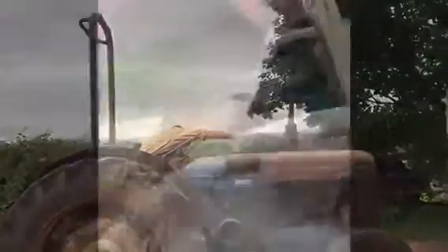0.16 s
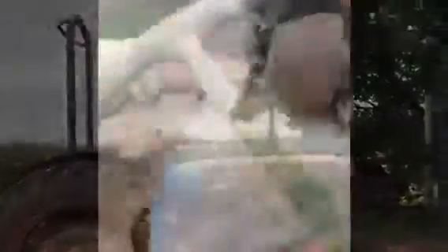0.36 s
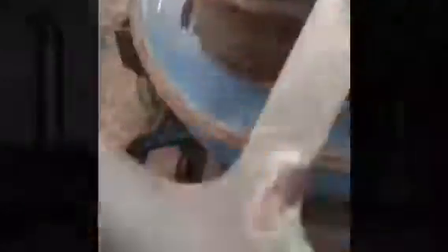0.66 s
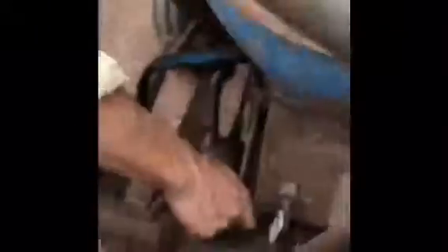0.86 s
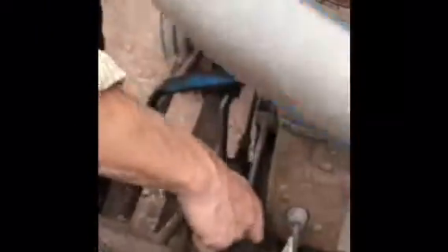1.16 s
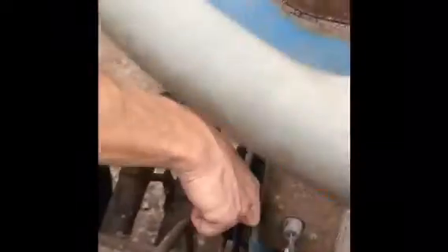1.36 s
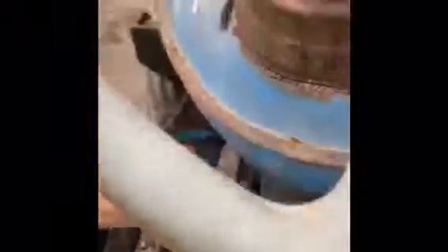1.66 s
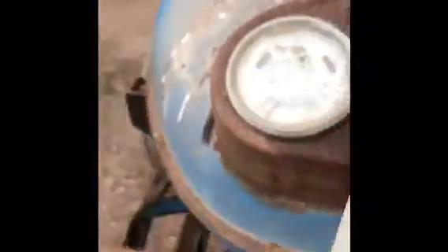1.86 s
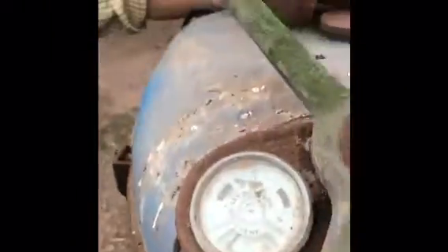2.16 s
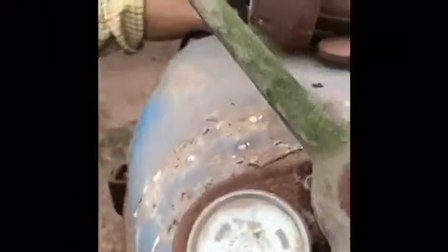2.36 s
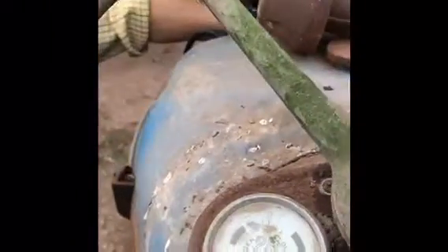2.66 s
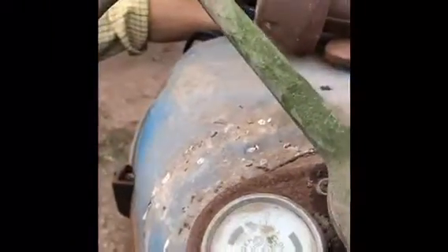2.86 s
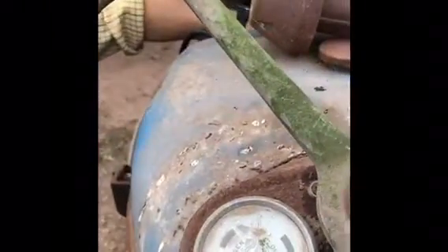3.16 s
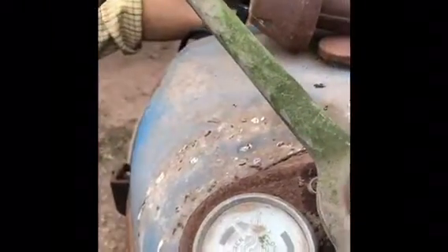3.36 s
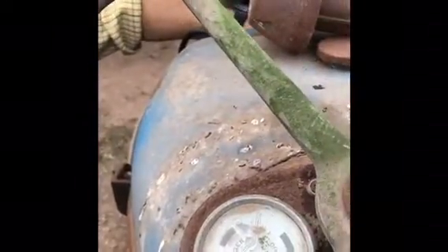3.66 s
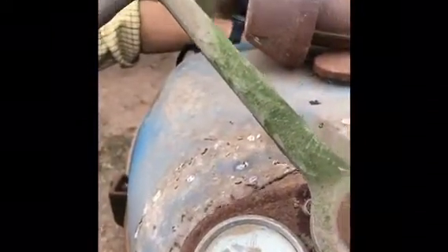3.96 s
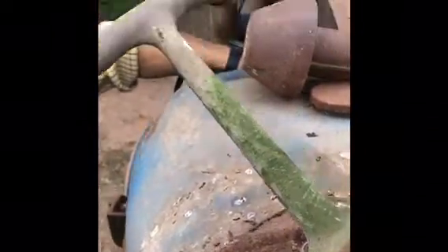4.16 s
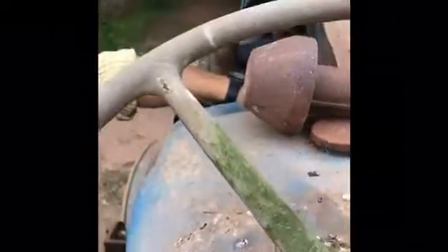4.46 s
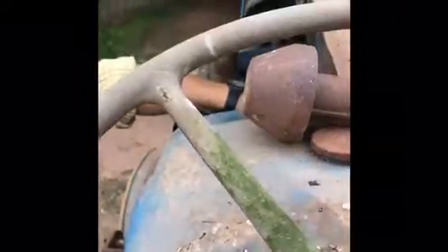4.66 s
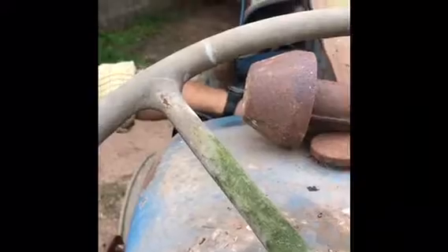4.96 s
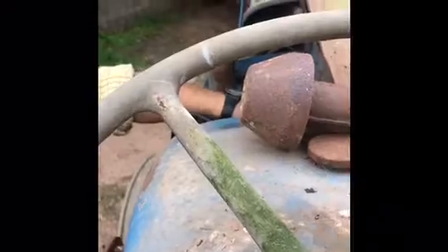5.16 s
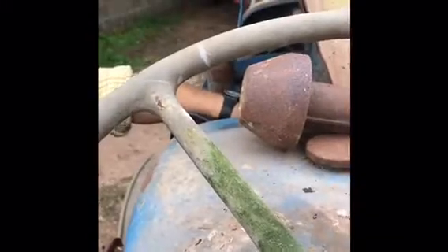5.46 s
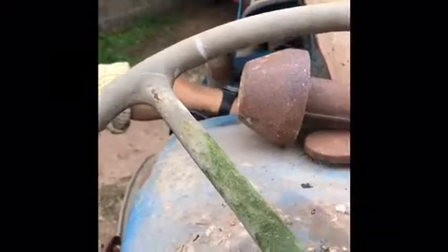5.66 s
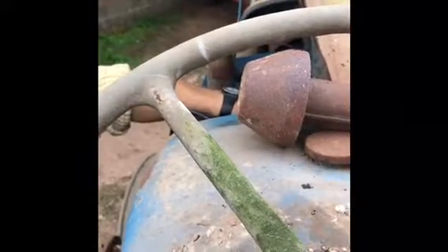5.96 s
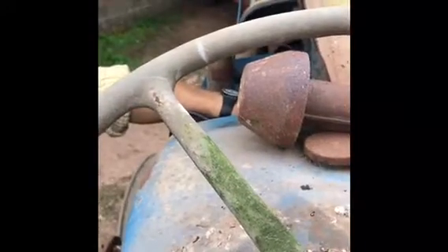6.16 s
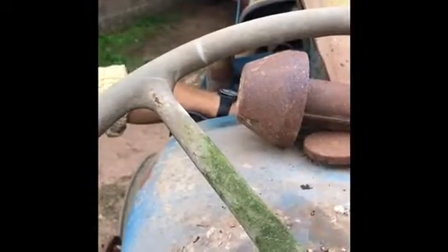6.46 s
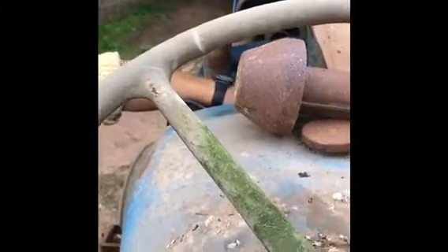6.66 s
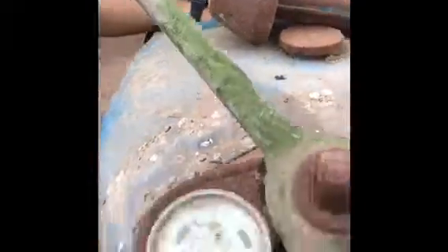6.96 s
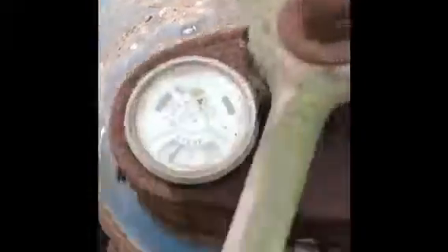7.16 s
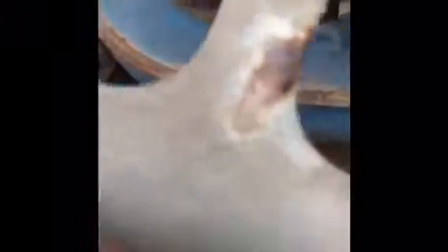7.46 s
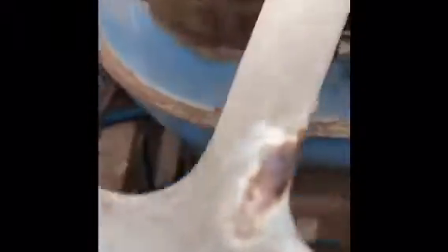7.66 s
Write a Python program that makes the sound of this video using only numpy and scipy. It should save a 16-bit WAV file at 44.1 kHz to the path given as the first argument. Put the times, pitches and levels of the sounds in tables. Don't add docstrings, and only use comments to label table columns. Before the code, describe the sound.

Close to a phone outdoors, an old tractor engine clatters to a stop with a last knock. After a quiet gap the starter is tried several times: clunk, whirring drone, dull exhaust thumps, a short harsh clash and later a long rough grind. Metal panels ring on after each try, levers tick, and a small bird calls faintly over light wind.

```python
import sys
import numpy as np
from scipy import signal
from scipy.io import wavfile
from scipy.ndimage import uniform_filter1d, minimum_filter1d

SR = 44100
rng = np.random.default_rng(int(sys.argv[2]) if len(sys.argv) > 2 else 0)


def elevation(decibels):
    levels = np.asarray(decibels, float)
    return 10 ** (levels / 20)


def master_out(mix):
    frames = np.transpose(np.atleast_2d(mix))
    ceiling = np.clip(frames, -1, 1)
    pcm = np.round(ceiling * 32767).astype(np.int16)
    wavfile.write(sys.argv[1], SR, pcm)


N = 343523

# pitch in Hz, width in Hz, level in dB.
HOUSING_MODES = [(567, 46, -9), (671.4, 77, -4.5), (742, 30, -2.5), (890, 94, -4), (950, 32, -5),
                 (990, 60, -7), (1091, 69, -7), (1200, 15, -12.5), (1288, 50, 0), (1537, 27, -12.5),
                 (1643, 60, -21)]
GEAR_MODES = [(2576, 100, -3.5), (2750, 140, -3), (2930, 60, -4), (3290, 98, -0.5), (3500, 98, 0),
              (3630, 100, -2), (3880, 60, -1), (4268, 140, -1), (4480, 61, -8.5)]
RIM_MODES = [(4266, 89, -4.5), (5300, 39, -3.5), (6100, 260, -8)]
COVER_MODES = [(1660, 27, -3), (2040, 180, -12.5), (2386, 90, -6.5)]
# frequency in Hz, level in dB.
HOUSING_WASH = [(330, -31), (450, -9.5), (1450, -11.5), (1800, -25), (2300, -54)]
GEAR_WASH = [(1700, -28.5), (2300, -12.5), (3000, -1.5), (4300, -5), (5100, -21.5), (6000, -46)]
RIM_WASH = [(3800, -39.5), (4500, -5), (7000, -13.5), (9500, -20), (12000, -48.5)]
COVER_WASH = [(1200, -33), (1550, -5.5), (2600, -9.5), (3200, -28.5)]
FIZZ_WASH = [(4000, -24.5), (7000, 0), (9500, 0.5), (10700, -7), (12500, -1.5), (15600, -8), (16000, -30),
             (16600, -39)]
# start in seconds, let-go in seconds,
# start level in dB, let-go level in dB, loose scrape of the teeth in dB.
PULLS = [
    (1.908, 2.15, -33.5, -37.5, 8),
    (3.444, 3.91, -27.5, -29, -5.5),
    (5.321, 5.39, -33.5, -32.5, -12),
    (5.401, 5.6, -26.5, -24, -8),
    (7.456, 7.8, -23.5, -29.5, -4.5),
]
GRINDS = [
    (2.719, 2.809, -20.5, -21.5, 1.5),
    (5.598, 6.096, -23.5, -13, 2),
]


def evened(x):
    return x / np.sqrt(np.mean(x ** 2) + 1e-20)


def body(modes, wash, size=16384):
    hz = np.fft.rfftfreq(size, 1 / SR)
    wash_hz, wash_db = np.transpose(wash)
    skirt_db = np.interp(np.log(hz + 1), np.log(wash_hz), wash_db, left=-90, right=-90)
    peaks = sum(elevation(2 * db) / (1 + (2 * (hz - mode_hz) / width) ** 2) ** 2 for mode_hz, width, db in modes)
    log_gain = np.log(elevation(2 * skirt_db) + peaks + 1e-9) / 2
    circle = np.concatenate([log_gain, log_gain[-2:0:-1]])
    spectrum = np.exp(circle - 1j * signal.hilbert(circle).imag)
    taps = np.fft.ifft(spectrum).real[:size // 2]
    return taps / np.linalg.norm(taps)


def ring(drive, modes, wash):
    return signal.oaconvolve(drive, body(modes, wash))[:N]


def wander(seconds):
    span = max(int(seconds * SR), 2)
    return evened(uniform_filter1d(uniform_filter1d(rng.standard_normal(N), span), span))


def resonate(x, hz, width):
    turn = np.exp(2j * np.pi * hz * np.arange(len(x)) / SR)
    r = np.exp(-np.pi * width / SR)
    smooth = signal.lfilter([(1 - r) ** 2], [1, -2 * r, r * r], x / turn)
    return 2 * (turn * smooth).real


def patchy(x, patchy_db):
    z = signal.stft(x, nperseg=512, noverlap=384)[2]
    field = rng.standard_normal(z.T.shape)
    field = uniform_filter1d(uniform_filter1d(field, 14, 0), 6, 1).T
    return signal.istft(z * elevation(patchy_db * evened(field)), nperseg=512, noverlap=384)[1][:N]


def shaking():
    rundown = [
        (-.02, 0.44, -35.5, -40, -2),
        (.472, 0.81, -38.5, -51.5, -1),
    ]
    # offset in dB, climb while held in dB/s, share of the drop (0-4), coasting fall in
    # dB/s.
    rundown_parts = [(2, 2.5, 1.3, 30), (4, -11, 0.84, 27), (-13, -18, 0.2, 18), (-24, -4, 1.2, 18),
                     (-21.5, 8, 3.6, 31), (-13.5, 16, .1, 8.5), (-7.5, -15, 0.49, 6.5), (-7, -6, 1.1, 1),
                     (-13.5, 13, 0.036, 2.5)]
    pull_parts = [(-0.5, 3.5, 1.05, 26.9), (-14, 28, 1.2, 36), (-31, 1.5, 0.87, 15), (-13, -5.5, 1.3, 28),
                  (-66, 1.5, 1.05, 30), (-6.5, -0.5, .1, 19), (-5, -0.5, 0.15, 22), (-5.5, 0, 0.14, 28),
                  (-23, 4, 0.092, 12)]
    grind_parts = [(-1.5, -5.5, 0.68, 66), (-1, -3.5, 0.55, 120), (-9.5, -6.5, 2.8, 30), (-2, -11.5, 1, 33),
                   (-60.5, 0.5, 1.05, 29.4), (-13.5, -3.5, 0.26, 8.7), (-13.5, -23, 0.27, 18),
                   (-8, -13.5, 0.51, 31), (-17.5, -15, .1, 3.9)]
    resting_db = [-67.5, -82, -75.5, -92, -120, -67, -67, -65, -56]
    scrape_share = [-0.23, 0.12, 1.1, -1, -0.14, 0.29, 0.44, -.3, -1.2]
    # time to let go [s], then level left after letting go [dB].
    release_times = [.08, .085, .11]
    coasting_levels = [-69.5, -35, -42]
    engage_s = .004

    t = np.arange(0, N / SR + .01, .001)
    power = elevation(2 * np.array(resting_db))[:, None] * np.ones(len(t))
    all_spells = (rundown, PULLS, GRINDS)
    all_parts = (rundown_parts, pull_parts, grind_parts)
    for spells, parts, release_s, coasting_db in zip(all_spells, all_parts, release_times, coasting_levels):
        offset_db, climb, share, coast = np.transpose(parts)[:, :, None]
        for start, end, start_db, end_db, scrape_db in spells:
            held = np.clip(t - start, 0, end - start)
            free = np.maximum(t - end, 0)
            db = start_db + offset_db + ((end_db - start_db) / (end - start) + climb) * held
            db = db + np.array(scrape_share)[:, None] * scrape_db
            db = db - share * (end_db - coasting_db) * np.minimum(free / release_s, 1) - coast * free
            power = power + elevation(2 * db) * np.clip((t - start) / engage_s, 0, 1) ** 2
    return [np.interp(np.arange(N) / SR, t, db) for db in 10 * np.log10(power)]


def starter(housing_db, gear_db, fizz_db, whine_db, clatter_db):
    click_level = elevation(3 * np.minimum(rng.exponential(1, N), 4))
    clicks = (rng.random(N) < 1500 / SR) * click_level * rng.choice([-1, 1], N)
    clumps = elevation(1.6 * wander(0.008) + 0.9 * wander(0.027))
    drive = evened(clumps * (.5 * evened(clicks) + 0.5 * rng.standard_normal(N)))
    housing = ring(drive * elevation(housing_db - 6.0), HOUSING_MODES, HOUSING_WASH)
    gear = ring(drive * elevation(gear_db - 8.0), GEAR_MODES, GEAR_WASH)
    rim = ring(drive * elevation(0.51 * gear_db + 0.47 * fizz_db - 6.5), RIM_MODES, RIM_WASH)
    cover_gain = elevation(clatter_db) + elevation(0.45 * housing_db + 0.53 * gear_db - 16.0)
    cover = ring(drive * cover_gain, COVER_MODES, COVER_WASH)
    fizz = ring(drive * elevation(fizz_db - 7.5), [], FIZZ_WASH)
    whine = elevation(whine_db) * evened(resonate(drive, 1290, 60))
    tappets = elevation(clatter_db + 5) * evened(resonate(drive, 3480, 450))
    return whine + patchy(tappets + housing + gear + rim + cover + fizz, patchy_db=2.0)


def sheet_metal(tank_db, bonnet_db, wing_db, rumble_db):
    # pitch in Hz, width in Hz, level in dB.
    tank_modes = [(140, 6.2, 0.002)]
    bonnet_modes = [(205, 1.4, -3.5), (238, 20, -14)]
    wing_modes = [(307, 17, 0.037), (358, 5.2, 1)]
    # frequency in Hz, level in dB.
    tank_wash = [(105, -44.5), (125, -9), (165, -13), (190, -51.5)]
    bonnet_wash = [(150, -48), (180, -13), (265, -20.5), (310, -44.5)]
    wing_wash = [(230, -39.5), (275, -6.5), (430, -9), (520, -45)]
    rumble_wash = [(22, -40), (40, -19.5), (60, -9.5), (105, -3), (125, -10.5), (150, -37)]

    shake = rng.standard_normal((4, N))
    tank = ring(shake[0] * elevation(tank_db - 5.0), tank_modes, tank_wash)
    bonnet = ring(shake[1] * elevation(bonnet_db - 1.5 + 0.56 * wander(.04)), bonnet_modes, bonnet_wash)
    wing = ring(shake[2] * elevation(wing_db - 3.5 + 0.5 * wander(.03)), wing_modes, wing_wash)
    rumble = ring(shake[3] * elevation(rumble_db - 5.5 + 1.6 * wander(.04)), [], rumble_wash)
    return tank + bonnet + wing + rumble


def gusts():
    # time in seconds, level in dB.
    gust_curve = [(0, -48), (.4, -50), (.8, -53), (1.05, -85), (1.5, -69.5), (7.79, -68)]
    # frequency in Hz, level in dB.
    gust_wash = [(15, -37), (24, 3.5), (40, 2.5), (60, -29)]
    level_db = np.interp(np.arange(N) / SR, *np.transpose(gust_curve))
    return ring(rng.standard_normal(N) * elevation(level_db + 2.4 * wander(.06)), [], gust_wash)


def open_air():
    # frequency in Hz, level in dB.
    air_wash = [(200, -7.5), (550, 6.5), (1400, -5.5), (2800, -11.5), (8000, -20.5), (15500, -24.5),
                (16000, -46), (16600, -50.5)]
    return elevation(-67 + 1.4 * wander(0.13)) * ring(rng.standard_normal(N), [], air_wash)


def puffs():
    # start in seconds, level in dB, pitch in Hz, length in seconds.
    puff_rows = [(0.01, -34.5, 3440, 0.019), (0.087, -39.5, 3480, .07), (0.255, -44, 3520, 0.043),
                 (0.292, -38, 3460, 0.045), (0.355, -48.5, 3420, 0.032), (0.404, -47, 2620, 0.048),
                 (0.466, -39, 3420, 0.064), (0.099, -48.5, 5170, 0.11), (2.126, -42.5, 1290, 0.087),
                 (3.489, -34, 1290, 0.054), (3.552, -42, 1290, 0.03), (3.564, -43, 2980, .03),
                 (3.631, -38, 1290, .04), (3.694, -34, 1290, 0.023), (3.764, -40, 2660, .05),
                 (3.791, -38, 3530, 0.053), (3.796, -34, 1290, 0.033), (3.807, -31, 960, 0.053),
                 (3.827, -39, 2640, 0.045), (3.891, -36, 1110, 0.019), (3.94, -29, 1290, 0.027),
                 (4.056, -43, 3900, 0.034), (4.078, -47, 1200, .04), (4.099, -52, 525, 0.21),
                 (4.208, -51, 2900, 0.047), (4.265, -50, 3870, .04), (4.3, -49.5, 515, .1),
                 (4.443, -56, 4200, .02), (4.585, -61, 2700, .04), (4.697, -67, 2880, .02),
                 (4.971, -55, 800, 0.036), (5.611, -32, 945, .04), (5.862, -28.5, 3820, 0.068),
                 (5.903, -29, 940, 0.062), (5.94, -26, 3700, 0.057), (6.029, -21.5, 882, 0.071),
                 (6.04, -24, 4080, 0.037), (6.077, -30, 895, 0.032), (2.735, -24.5, 522, 0.073),
                 (5.63, -27, 368, 0.056), (5.75, -34, 1480, 0.041), (6.1, -35.5, 1500, 0.045),
                 (7.536, -38, 1200, .06), (7.649, -36.5, 3600, 0.021)]
    out = np.zeros(N + SR)
    for (s, db, hz, length), scrape in zip(puff_rows, rng.standard_normal((len(puff_rows), SR // 4))):
        band = evened(resonate(scrape, hz, .12 * hz))
        band = band[SR // 50:][:int(1.5 * length * SR)]
        swell = np.sin(np.pi * np.linspace(0, 1, len(band)) ** 0.5)
        out[round(s * SR):][:len(band)] += elevation(db) * band * swell
    return out[:N]


def blows():
    # start in seconds, knock peak in dB, ring gear above the knock in dB,
    # knock pitch in Hz.
    knock_rows = [(0.0188, -27, -4.5, 930), (0.1905, -29.5, -3, 670), (0.365, -27, -4.5, 660),
                  (0.472, -33.5, -9, 477), (0.5046, -28.5, 1.5, 950), (0.5165, -19.5, -22, 1310),
                  (0.621, -10, -11.5, 1240), (0.7058, -22.5, -17, 1290), (0.7784, -28, -10.5, 1170),
                  (0.844, -32.5, -14, 1370), (0.897, -43.5, -14, 450), (1.244, -42, -16.5, 470),
                  (1.4075, -32.5, -27, 500), (1.8517, -40, -25, 444), (4.389, -29, -21, 1200),
                  (1.598, -47, -22, 950), (1.155, -51, -25, 620), (4.791, -40, -14.5, 1410),
                  (4.92, -43, -35, 1056)]
    clunk_rows = [
        (1.9149, -21.5, -5.5, 790),
        (2.697, -34.5, -2.5, 1200),
        (3.4486, -13, -5.5, 668),
        (5.332, -32, -13, 875),
        (7.4659, -13.5, 0.5, 1240),
    ]
    stroke_rows = [(3.801, -29, -6, 990), (2.175, -36.5, -3, 1030), (2.2515, -46, 5, 1290),
                   (4.06, -30.5, -5.5, 1170), (4.25, -24, -6.5, 1250), (4.435, -48.5, 4, 784),
                   (4.9789, -49.5, -14, 760), (7.7303, -30, 4, 773), (7.7613, -21.5, -1, 1400)]
    clash_rows = [(2.724, -25.5, -1, 1190), (2.7354, -7, -0.5, 1280), (2.7466, -15.5, 3, 900),
                  (2.7601, -10, -0.5, 1310), (2.7835, -14, 2.5, 900), (2.7974, -12, 0, 1300),
                  (5.5776, -35, -0.5, 1200), (5.604, -19, 2.5, 730), (5.6202, -19, 2, 900),
                  (5.6789, -23, 2, 1290), (5.8269, -25.5, 3.5, 1290), (5.853, -21, 4, 1200),
                  (5.9624, -15.5, 2, 901), (5.985, -21, 4, 1290), (5.92, -16.5, 5.5, 900),
                  (6.0425, -14, -0.5, 900), (6.059, -11, -3.5, 1290), (5.6523, -17.5, 2, 1330),
                  (5.7013, -13, 5.5, 664), (5.729, -19.5, 7.5, 1290), (5.7845, -6.5, 2, 1200),
                  (5.905, -19, 11, 736), (5.9375, -13, 5.5, 970), (6.0222, -5.5, -2.5, 1300),
                  (6.091, -16.5, 4, 732)]
    snap_rows = [
        (2.0727, -51, 13, 713),
        (3.4289, -34, 0, 2280),
        (3.9348, -19.5, -12.5, 1290),
    ]
    hiss_rows = [(3.667, -43.5, 7, 746), (3.897, -36.5, 6.6, 706), (5.45, -57, 6, 900),
                 (5.545, -49.5, 6, 900), (7.668, -44.5, 9.4, 960), (7.755, -63, 6.5, 960)]
    # rise in seconds, t60 in seconds,
    # fizz above the gear in dB, cover above the knock in dB, housing above the knock in dB.
    blow_kinds = [(0.0032, 0.044, -5, -19.5, -25), (0.0041, 0.052, -21.5, -32, -7),
                  (0.02, 0.154, -23, -23, -8), (0.003, 0.068, -10, -18.5, -8),
                  (0.0033, 0.065, 4.5, -28, -11), (0.015, .08, 8, -19.5, -7.5)]

    gear, rim, fizz, knock, housing, cover = np.zeros((6, N + SR))
    t = np.arange(SR // 2) / SR
    all_rows = (knock_rows, clunk_rows, stroke_rows, clash_rows, snap_rows, hiss_rows)
    for rows, (rise_s, t60, fizz_up_db, cover_up_db, housing_up_db) in zip(all_rows, blow_kinds):
        fall_db = 60 * t / t60
        rise = np.minimum(t / rise_s, 1) ** 2
        for (s, knock_db, gear_up_db, hz), noise in zip(rows, rng.standard_normal((len(rows), len(t)))):
            at = slice(round(s * SR), round(s * SR) + len(t))
            gear_db = knock_db + gear_up_db
            pitched = rise * evened(resonate(noise, hz, .6 * hz))
            burst = rise * noise
            gear[at] += elevation(gear_db - 1.0 - fall_db) * burst
            rim[at] += elevation(0.85 * gear_db + 0.21 * fizz_up_db - 3.0 - 1.7 * fall_db) * burst
            fizz[at] += elevation(gear_db + fizz_up_db + 1.0 - 1.6 * fall_db) * burst
            housing[at] += elevation(knock_db + housing_up_db - 0.51 * fall_db) * burst
            cover[at] += elevation(knock_db + cover_up_db - 0.71 * fall_db) * burst
            knock[at] += elevation(knock_db - 6.5 - 0.49 * fall_db) * pitched
    bright = ring(gear, GEAR_MODES, GEAR_WASH) + ring(rim, RIM_MODES, RIM_WASH) + ring(fizz, [], FIZZ_WASH)
    dull = ring(housing, HOUSING_MODES, HOUSING_WASH) + ring(cover, COVER_MODES, COVER_WASH)
    return knock[:N] + dull + bright


def ticks():
    # start in seconds, peak in dB, pitch in Hz, t60 in seconds.
    tick_rows = [(0.0434, -47, 3320, 0.024), (0.0694, -32, 2360, 0.012), (0.1497, -24, 4550, 0.055),
                 (0.2094, -28, 3325, 0.027), (0.2578, -41.5, 3470, 0.024), (0.294, -25, 3620, 0.12),
                 (0.329, -19.5, 3640, 0.026), (0.407, -32, 2500, 0.046), (0.5894, -48, 2700, 0.037),
                 (1.384, -57, 3050, 0.04), (1.5994, -52, 7560, 0.04), (2.578, -43, 2880, 0.062),
                 (4.53, -46, 3550, 0.064), (4.8948, -47, 2680, 0.02), (5.0028, -49, 7160, 0.025),
                 (5.0344, -49, 6920, 0.035), (5.1027, -42, 7920, 0.02), (5.119, -41.5, 8740, 0.026),
                 (5.184, -49, 10900, 0.02), (5.193, -49, 10000, .02), (5.058, -54, 9000, .02),
                 (5.069, -53, 8000, .02), (5.112, -48, 10000, 0.017), (5.402, -45, 11000, 0.027),
                 (4.945, -45, 2000, 0.022), (7.298, -62.5, 11000, 0.018), (1.855, -45, 1500, 0.023),
                 (5.244, -52.5, 8050, 0.095), (5.2775, -38.5, 6460, 0.078), (6.555, -49, 4680, 0.024),
                 (6.9994, -56.5, 2650, 0.039), (7.1117, -54, 2650, 0.042), (7.3133, -38.5, 2670, 0.033)]
    switch_rows = [(1.886, -44, 12500, 0.1), (3.392, -60, 13000, .08), (3.47, -39, 12000, 0.05),
                   (5.28, -36.5, 9000, 0.03), (6.9, -51, 15000, .1), (7.449, -40, 17000, 0.082),
                   (5.278, -46, 18000, 0.066), (3.431, -33, 14000, 0.035)]
    rows = tick_rows + switch_rows
    out = np.zeros(N + SR)
    t = np.arange(SR // 10) / SR
    for (s, db, hz, t60), burst in zip(rows, rng.standard_normal((len(rows), len(t)))):
        tap = evened(resonate(burst, hz, 0.74 * hz)) + hz / 18000 * np.diff(burst, prepend=0)
        fall = elevation(db - 7.5 - 60 * t / np.clip(t60, .01, .1))
        out[round(s * SR):][:len(t)] += fall * np.minimum(t / 0.0028, 1) * tap
    return out[:N]


def yard(x):
    t = np.arange(SR // 3) / SR
    echoes = (rng.random(len(t)) < 2000 / SR) * rng.choice([-1, 1], len(t))
    taps = echoes * elevation(-60 * t / 0.22) * (t > .004)
    return signal.oaconvolve(x, taps / np.linalg.norm(taps))[:N]


def after_ring():
    # start in seconds, level in dB, then modes of pitch in Hz, level in dB, t60 in seconds.
    ring_rows = [
        (0.8, -55.5, [(105.7, 5, 9), (68.4, -2, 9), (238, -7.5, 2), (276, -4.5, 4)]),
        (1.409, -58, [(330, 1, 1.3), (990, -9.5, 3.2)]),
        (2.1, -48.5, [(1290, -2, 2.4), (890, -4.5, 1.8), (2590, -12, 2.5)]),
        (2.829, -34, [(88.25, -9, 3.6), (205, 1, 1.6), (307, -8, 1.2), (414, -27, 2.7), (624, -15, 0.55), (672, -16.5, 1.6)]),
        (3.999, -43.5, [(140, -4.5, 4), (307, -2, 1.8), (371, -8, 2), (680, -9.5, 1.6), (1287, -7, 1.8)]),
        (6.12, -29, [(140, 2, 1.1), (205, -7, 2.4), (238, -14, 2.6), (307, -7.5, 1.1), (373, -9.5, .6), (690, -23, 1.9), (896, -21, 1.4), (1007, -17.5, 0.67), (1220, -38.5, 5)]),
    ]
    out = np.zeros(N)
    flicker = elevation(2.0 * wander(0.03))
    flicker = np.concatenate([flicker, flicker[::-1]])
    for s, level_db, modes in ring_rows:
        t = np.arange(N - round(s * SR)) / SR
        grip = min(row[0] for row in PULLS + GRINDS if row[0] > s) - s
        free = np.clip(1 - (t - grip) / .04, 0, 1)
        for (hz, db, t60), (phase, shift) in zip(modes, rng.random((len(modes), 2))):
            tone = np.sin(2 * np.pi * (hz * t + phase)) * np.minimum(t / 0.025, 1)
            tone = tone * flicker[int(shift * N):][:len(t)]
            out[-len(t):] += elevation(level_db + db - 60 * t / t60) * tone * free
    return out


def bird():
    # start in seconds, level in dB, pitch in Hz, t60 in seconds.
    calls = [
        (1.572, -63, 7670, 0.35),
        (1.72, -61.5, 7220, 0.38),
        (4.449, -66.5, 7500, 0.48),
        (4.681, -83.5, 6780, 0.2),
        (4.994, -73, 7170, 1),
        (6.768, -76, 7140, .4),
    ]
    out = np.zeros(N)
    t = np.arange(SR // 4) / SR
    for s, db, hz, t60 in calls:
        breath = rng.standard_normal(len(t))
        whistle = evened(resonate(breath, hz, 110)) + .45 * evened(resonate(breath, 1.14 * hz, 250))
        buzz = 1.04 * evened(resonate(breath, .93 * hz, 900)) * elevation(-60 * t / (1.1 * t60))
        call = elevation(db - 60 * t / t60) * whistle + elevation(db) * buzz
        out[round(s * SR):][:len(t)] += call * np.minimum(t / 0.0092, 1)
    return out


def drone():
    # time in seconds, pitch in Hz, level in dB.
    tries = [
        [(1.92, 170, -44), (1.934, 173, -27), (2.022, 237, -43), (2.07, 190, -59), (2.106, 212, -38),
         (2.328, 202, -36.5), (2.538, 215, -61), (2.6, 238, -45)],
        [(3.46, 181, -26), (3.538, 209, -26), (3.704, 209, -23.5), (3.822, 202, -33), (3.842, 215, -27.5),
         (4.1, 180, -37.5), (4.228, 180, -43), (4.3, 224, -41)],
        [(5.36, 176, -51), (5.406, 172, -35), (5.54, 188, -28), (5.598, 170, -32.5), (5.64, 189, -35.5),
         (5.672, 191, -24.5), (5.692, 173, -27), (5.75, 183, -28)],
        [(7.48, 191, -47), (7.484, 192, -38), (7.62, 201, -23), (7.644, 202, -42), (7.69, 200, -21),
         (7.728, 224, -30), (7.766, 223, -25), (7.79, 198, -14)],
    ]
    out = np.zeros(N)
    for s, hz, db in map(np.transpose, tries):
        t = np.arange(s[0], min(s[-1], N / SR - .001), 1 / SR)
        tone = np.sqrt(2) * np.sin(2 * np.pi * np.cumsum(np.interp(t, s, hz)) / SR)
        level = elevation(np.interp(t, s, db) - 5)
        out[round(s[0] * SR):][:len(t)] += level * tone * signal.windows.tukey(len(t), .1)
    return out


def exhaust():
    # start in seconds, level in dB, start pitch in Hz, end pitch in Hz, length in seconds.
    thumps = [
        (3.682, -27, 58, 77.7, 0.15),
        (3.91, -26.5, 57.6, 82.2, 0.12),
        (5.586, -34.5, 56.85, 82, 0.21),
        (7.695, -26, 57.3, 77, 0.15),
    ]
    out = np.zeros(N)
    for s, db, start_hz, end_hz, length in thumps:
        u = np.linspace(0, 1, int(length * SR))
        turns = np.cumsum(start_hz + (end_hz - start_hz) * np.sqrt(u)) / SR
        thump = elevation(db - 1.5 - 3.3 * u) * np.sin(2 * np.pi * turns) * signal.windows.tukey(len(u), .3)
        part = out[round(s * SR):][:len(u)]
        part += thump[:len(part)]
    return out


def scene():
    *teeth_db, tank_db, bonnet_db, wing_db, rumble_db = shaking()
    iron = starter(*teeth_db) + puffs() + blows() + ticks()
    low = sheet_metal(tank_db, bonnet_db, wing_db, rumble_db) + gusts() + after_ring() + drone() + exhaust()
    return (iron + elevation(-10.0) * yard(iron) + low + bird() + open_air())[None]


def low_pass(x):
    return signal.sosfilt(signal.butter(12, 16430, fs=SR, output="sos"), x)


def record(dry):
    # frequency in Hz, level in dB.
    hiss_wash = [(1500, -36.5), (3000, 3.5), (9000, -5.5), (15600, -0.5), (16000, -29), (16600, -41)]
    loud_db, hold_s, hiss_db = -27, .35, -68
    quiet = 1. * (uniform_filter1d(dry[0] ** 2, 3000) < elevation(2 * loud_db))
    hold = int(hold_s * SR)
    open_gate = 1 - minimum_filter1d(quiet, hold, origin=(hold - 1) // 2)
    hiss = elevation(hiss_db) * uniform_filter1d(open_gate, 400) * ring(rng.standard_normal(N), [], hiss_wash)
    no_bass = signal.sosfilt(signal.butter(2, 40, "high", fs=SR, output="sos"), dry + hiss)
    rounded = 1.23 * np.tanh(no_bass / 0.94)
    treble_edge = signal.firwin(511, 15950, fs=SR)[None]
    return low_pass(signal.oaconvolve(rounded, treble_edge, "same"))


dry = scene()
out = record(dry)
master_out(out)
```